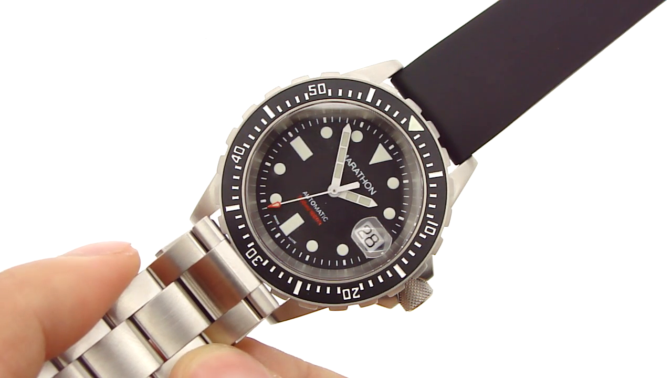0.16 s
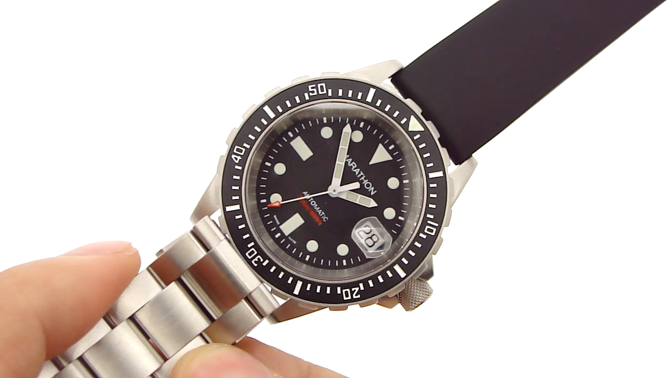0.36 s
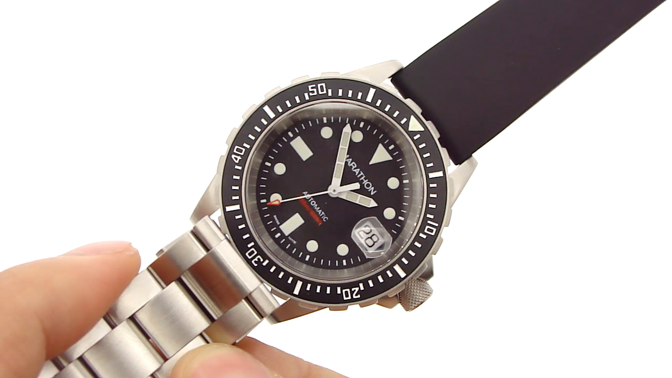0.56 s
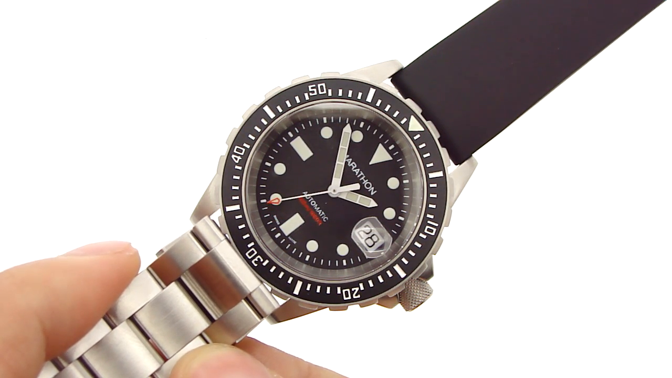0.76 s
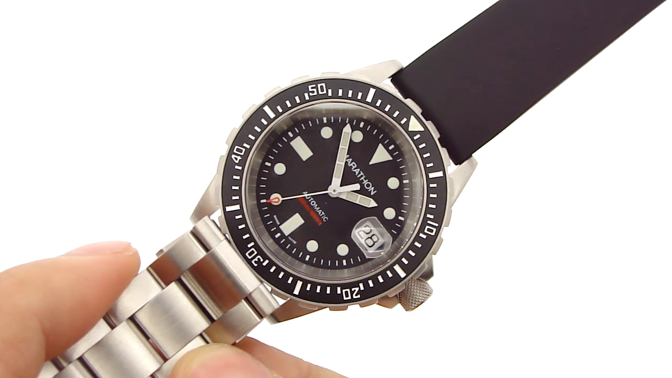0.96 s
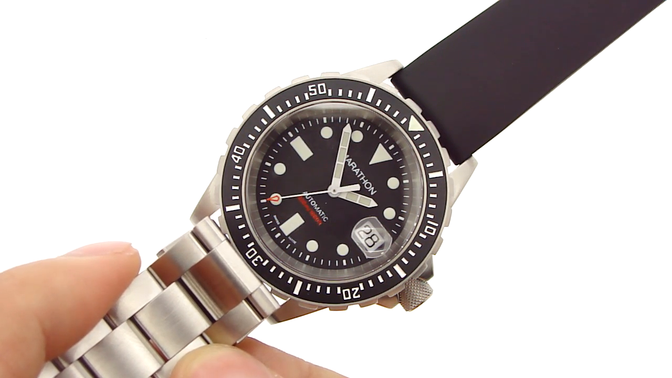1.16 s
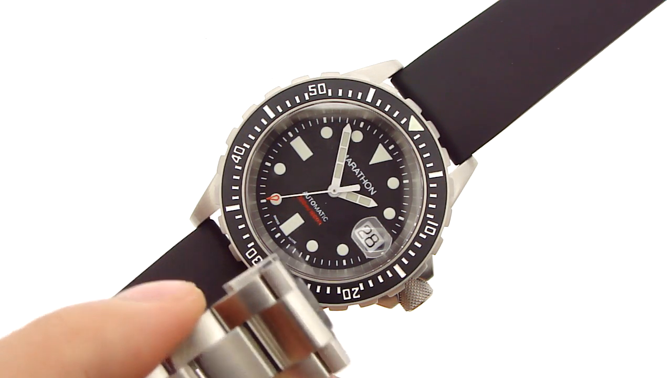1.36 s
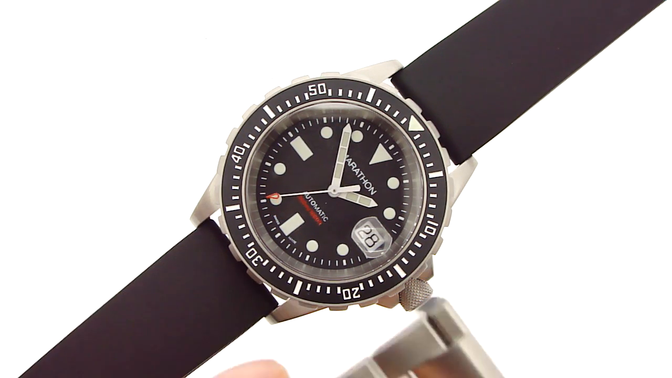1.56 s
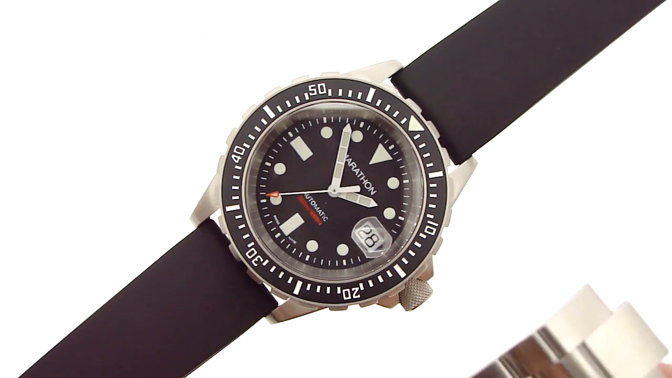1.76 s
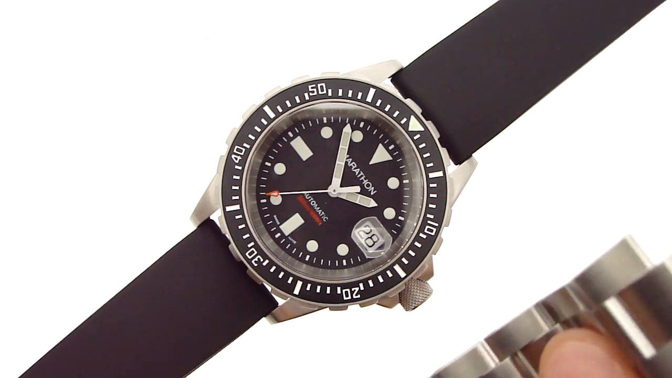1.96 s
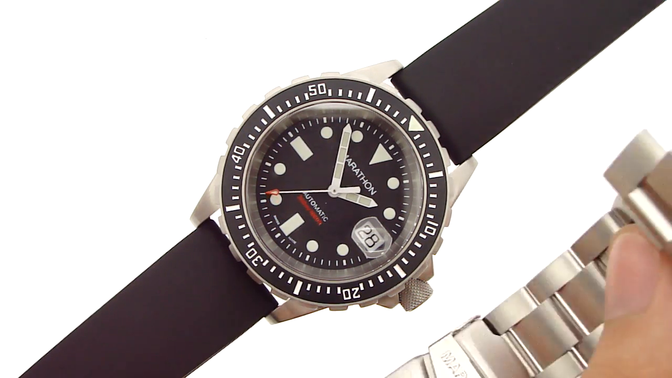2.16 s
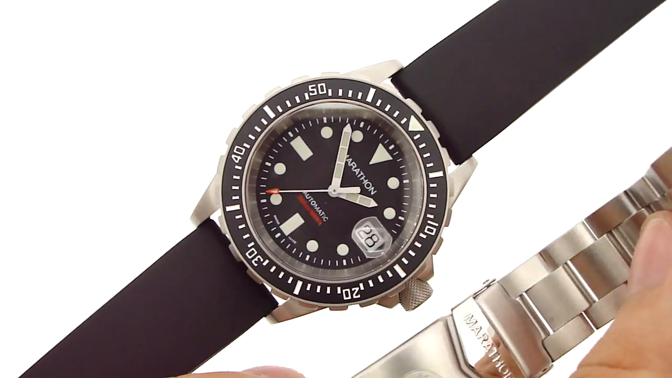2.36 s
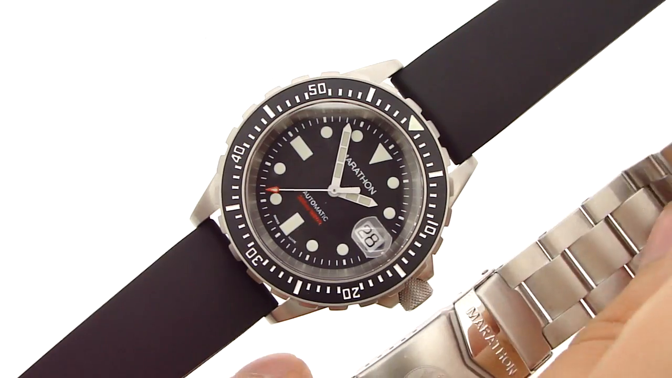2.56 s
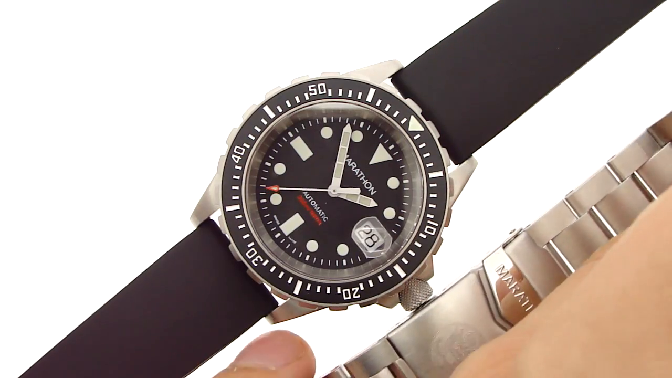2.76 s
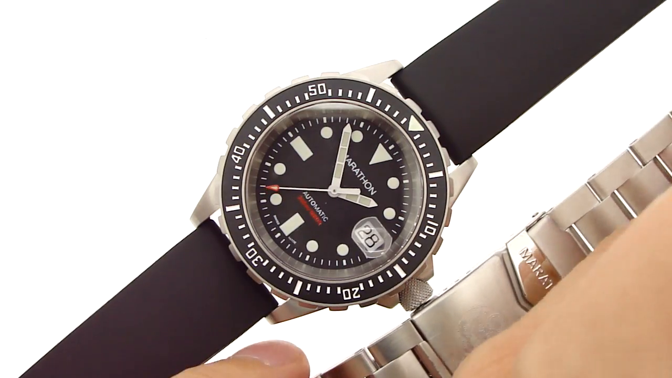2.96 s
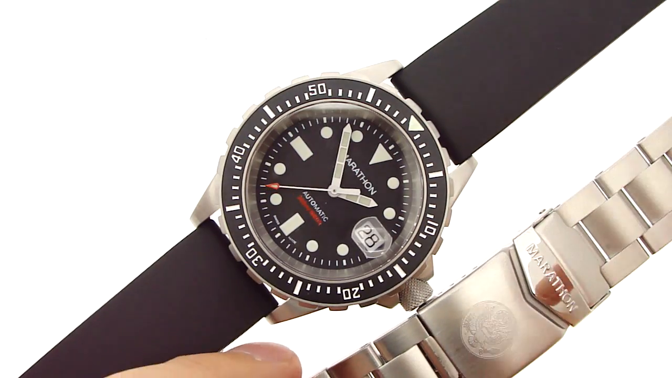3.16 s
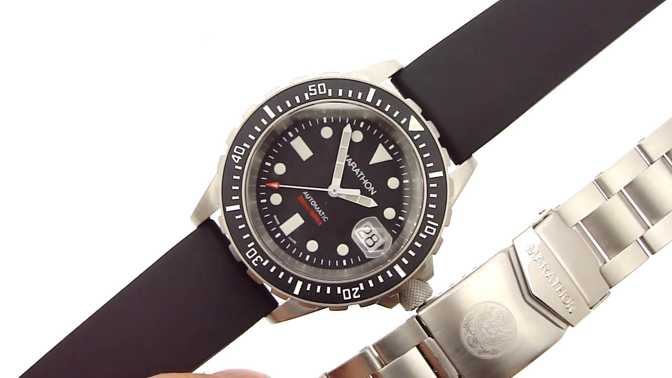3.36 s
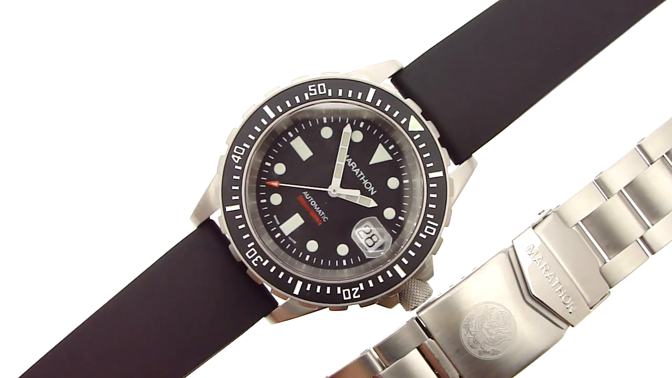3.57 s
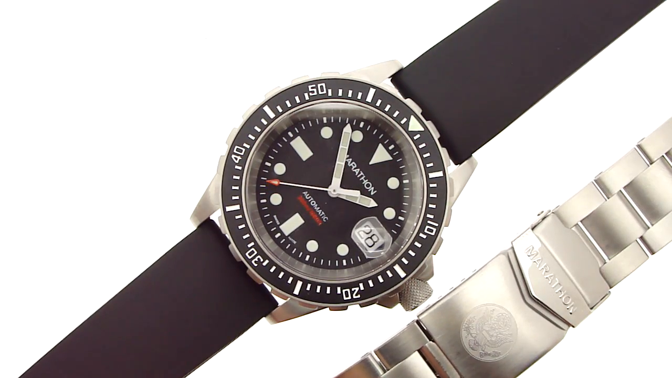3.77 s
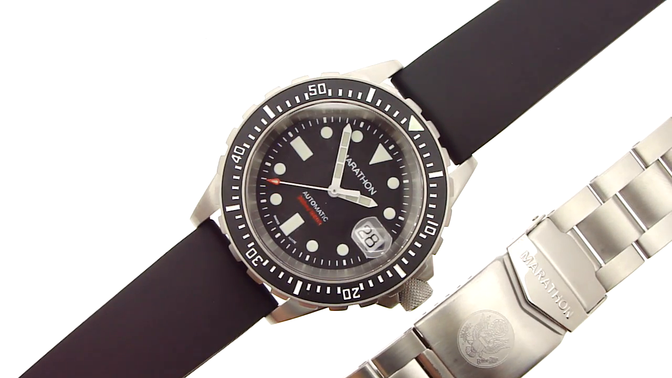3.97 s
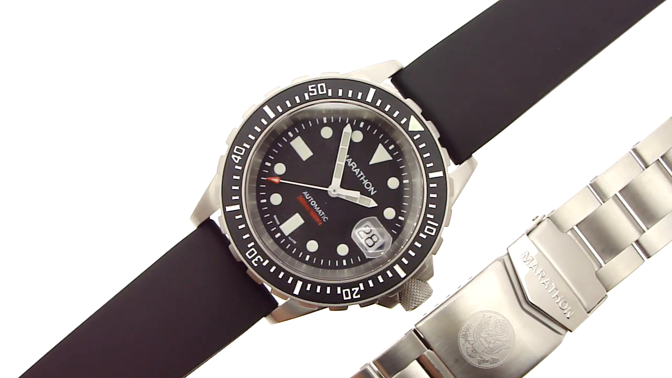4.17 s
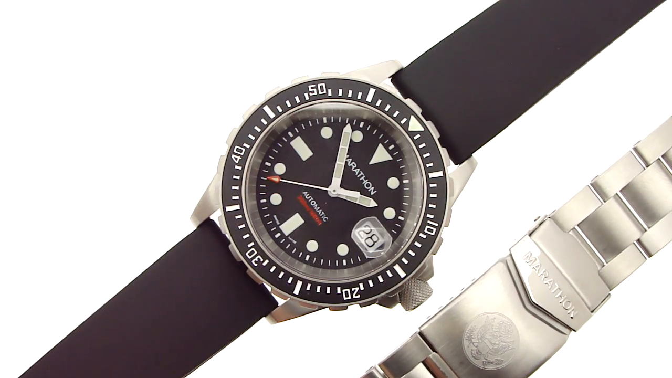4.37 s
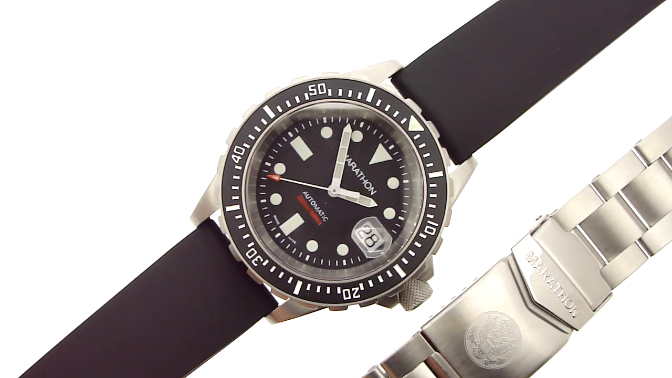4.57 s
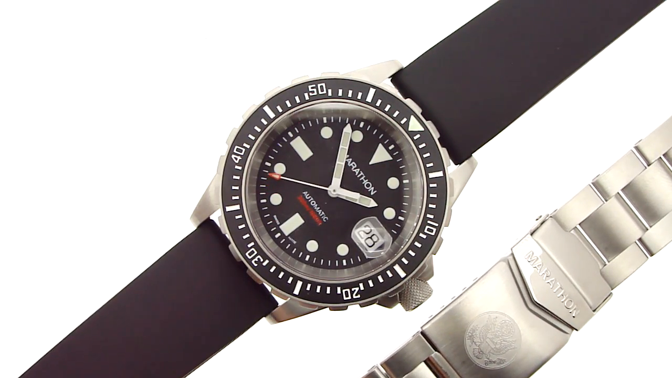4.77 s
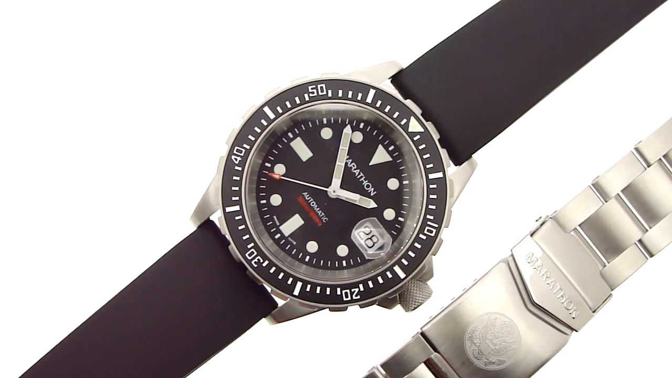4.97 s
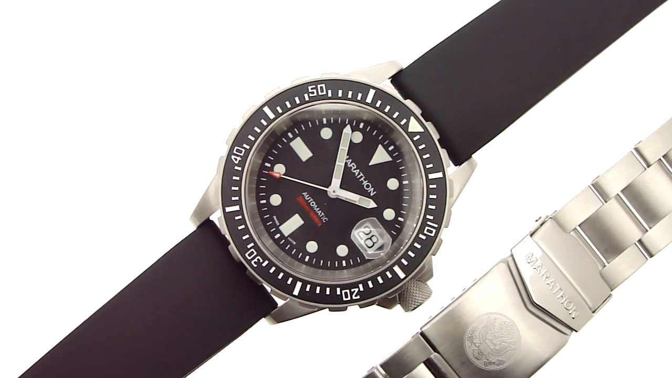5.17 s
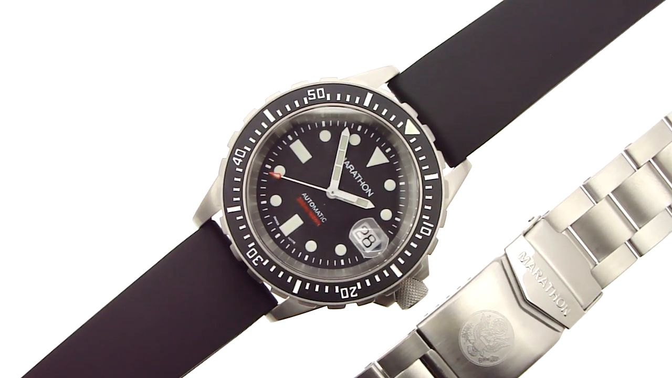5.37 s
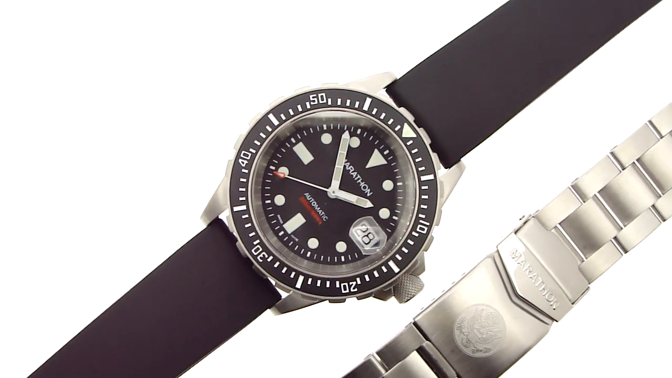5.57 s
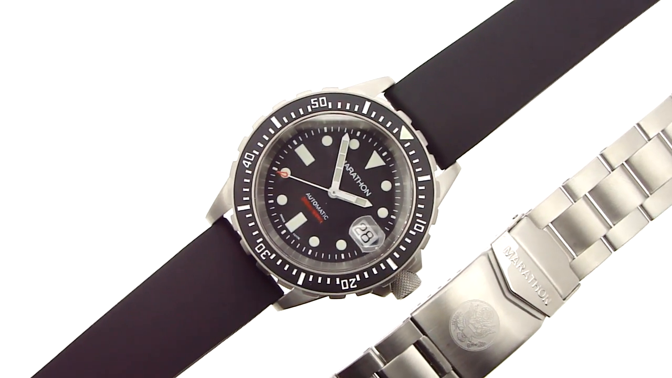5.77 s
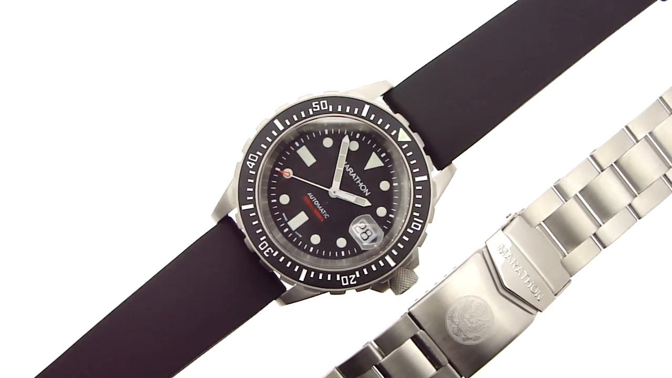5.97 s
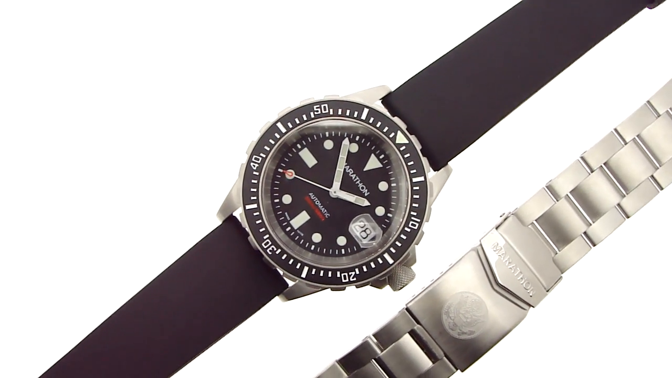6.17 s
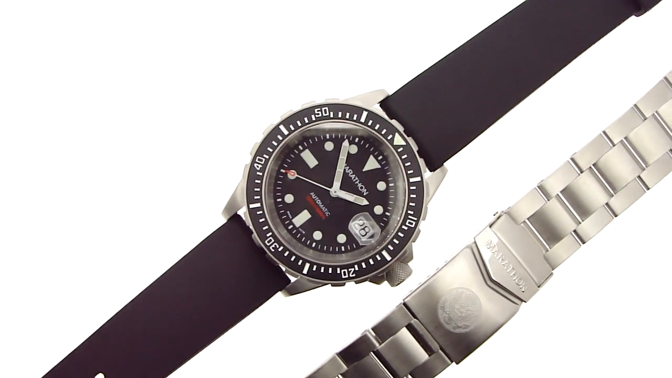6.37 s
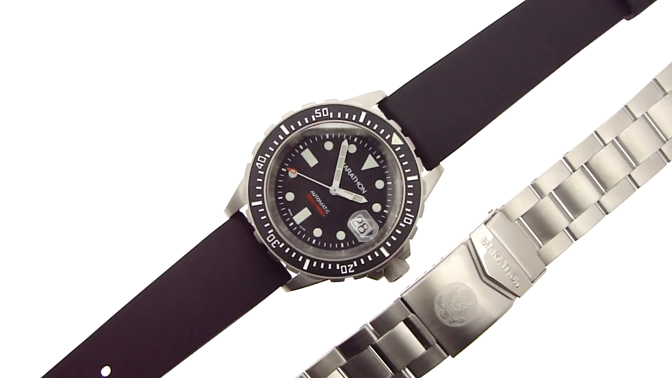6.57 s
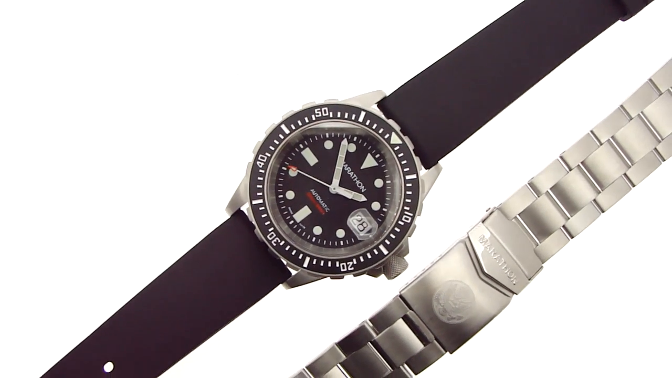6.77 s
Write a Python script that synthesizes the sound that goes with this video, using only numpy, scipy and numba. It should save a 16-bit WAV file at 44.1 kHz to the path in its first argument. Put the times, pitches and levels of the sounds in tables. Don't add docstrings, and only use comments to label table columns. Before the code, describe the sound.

Indoors, a fan hums steadily with airy duct noise. A steel bracelet ticks faintly as it is lifted, then its links land in sharp clinks, slide and scrape, tip over and settle with brighter clatter on a hollow board. After a pause, fingers tap and rub the camera shell and its zoom motor whirs. The close small-camera microphone sounds slightly dull at the top, and the hum dips after loud hits.

```python
import sys
import numpy as np
from scipy import signal
from scipy.fft import rfft, irfft
from scipy.io import wavfile
from scipy.ndimage import uniform_filter1d
from numba import njit

SR = 44100
rng = np.random.default_rng(int(sys.argv[2]) if len(sys.argv) > 2 else 0)


def bounce(signal):
    frames = np.transpose(np.atleast_2d(signal))
    limited = np.clip(frames, -1, 1)
    pcm = np.round(limited * 32767).astype(np.int16)
    wavfile.write(sys.argv[1], SR, pcm)


def gain_from_db(level_db):
    decades = np.asarray(level_db, float) / 20
    return 10 ** decades


N = 300743

# mode_hz, width_hz, level_db
LINKS = [(2840, 570, 8.5), (2870, 98, -6), (3420, 300, -6), (3540, 97, -13), (4240, 420, -11),
         (4670, 280, 1.5), (4750, 370, -27), (5500, 170, -10), (6200, 230, -17), (6930, 400, -2.5),
         (8850, 510, 1.5), (9400, 200, -20), (9500, 290, -3), (10430, 210, -7.5), (11000, 1600, -20)]
BOARD = [(383, 62, -7), (560, 67, 2.5), (710, 150, 1), (1049, 60, 0.5), (1280, 86, -3), (1430, 250, 3)]
CASE = [(370, 46, -1.5), (580, 78, 0), (720, 59, -4), (1150, 140, -1), (1590, 84, 4), (2050, 300, -8)]


def level(x, db):
    return x * gain_from_db(db) / np.sqrt(np.mean(x ** 2))


def curve(rows):
    s, value = np.transpose(np.array(rows, float))
    return np.interp(np.arange(N) / SR, s, value, left=-150, right=-150)


def band(x, lo_hz, hi_hz, order=2):
    return signal.sosfilt(signal.butter(order, [lo_hz, hi_hz], "band", fs=SR, output="sos"), x)


def even_band(x, lo_hz, hi_hz):
    return signal.sosfiltfilt(signal.butter(2, [lo_hz, hi_hz], "band", fs=SR, output="sos"), x)


def ring(modes, gain, size=1536):
    hz, width_hz, db = np.transpose(modes)[:, :, None]
    t = np.arange(size) / SR
    sines = np.exp(-np.pi * width_hz * t) * np.sin(2 * np.pi * hz * t)
    return np.sum(gain[:, None] * gain_from_db(db) * sines, axis=0)


def walk(rate_hz):
    hold = int(SR / rate_hz)
    held = np.repeat(rng.standard_normal(N // hold + 1), hold)
    return 1.104 * uniform_filter1d(uniform_filter1d(held, hold), hold)[:N]


def fan():
    # freq_hz, density_db_per_hz
    room_air = [(15, -72), (25, -35), (55, -34), (91, -23.5), (118, -7.5), (201, -7.5), (234, -1.5),
                (431, -11), (515, -12.5), (925, -11), (1390, -12.5), (1580, -13), (2090, -11.5),
                (3300, -22.5), (10900, -37), (14200, -79), (22000, -120)]
    # centre_hz, width_hz, lift_db
    duct = [(250, 330, 1), (745, 25, 9), (1167, 22, 3.5), (1351, 91, 6.5), (1550, 150, -1.5),
            (1815, 85, 3.5), (2095, 70, 6), (3470, 120, 0.5), (4340, 630, 3), (7000, 160, 6.5),
            (9900, 1340, 5)]
    # line_hz, rms_db
    blade_lines = [(58.6, -71), (73, -74), (117, -62.5), (131, -56), (176, -58.5), (234, -53.5), (468, -65),
                   (526, -63), (1346, -71), (1754, -58)]
    # time_s, share of the 2 kHz air masked (0-1)
    shade = [
        (0, 0.05),
        (3.5, 0.06),
        (4.6, 0.2),
        (5.3, 0.43),
        (6.82, 0.47),
    ]
    f = np.maximum(np.fft.rfftfreq(N, 1 / SR), 1)
    hz, db = np.transpose(room_air)
    shape_db = np.interp(np.log(f), np.log(hz), db)
    for centre_hz, width_hz, lift_db in duct:
        shape_db = shape_db + lift_db / (1 + (2 * (f - centre_hz) / width_hz) ** 2)
    air = irfft(rfft(rng.standard_normal(N)) * gain_from_db(shape_db), N) * gain_from_db(.5 * walk(3.16))
    air = air - np.clip(curve(shade), 0, 1) * even_band(air, 1920, 2410)
    turn = 2 * np.pi * np.cumsum(1 + 0.000593 * walk(1.964)) / SR
    lines = 0
    for line_hz, rms_db in blade_lines:
        gain = np.sqrt(2) * gain_from_db(rms_db + 2.0 * walk(6))
        lines = lines + gain * np.sin(line_hz * turn + 6 * rng.random())
    return level(air, -43) + lines


def strokes(rows, body):
    attack_db_s, release_db_s = 316, 189
    flat_db, tipped_db = (2.1, -4, -3.5, -11), (1, 0.5, 3.5, 9.4)
    t, power = np.arange(0, N / SR, .001), 0
    for start_s, hold_s, pressure_db, metal_db, tipped in rows:
        db = (pressure_db, pressure_db, metal_db, metal_db)[body]
        db = db + np.interp(tipped, [0, 1], [flat_db[body], tipped_db[body]])
        fade_db = attack_db_s * np.maximum(start_s - t, 0) + release_db_s * np.maximum(t - start_s - hold_s, 0)
        power = power + gain_from_db(db - fade_db) ** 2
    return np.interp(np.arange(N) / SR, t, np.sqrt(power))


def scrape():
    # start_s, hold_s, pressure_db, metal_db, share tipped on edge (0-1)
    chain_strokes = [
        (1.35, 1, -69, -69.5, 0.63),
        (2.36, 0.35, -51.5, -62.5, 0.62),
        (2.66, 0.15, -44, -43.5, 0),
        (2.89, 0.081, -47.5, -50, 0.1),
        (3.02, 0.13, -52, -57, 1),
        (3.21, 0.093, -53.5, -62, 0.73),
        (3.36, 0.016, -51, -45, 0.4),
        (3.41, 0.033, -53, -49, 0.25),
        (2.57, 0.046, -61, -56, 0.1),
    ]
    finger_strokes = [
        (4.9, .35, -67, -61, .3),
        (5.04, 0.19, -56, -64, 0.73),
        (5.345, 0.045, -41, -52, 0.3),
        (5.48, 0.15, -66, -64, 0.25),
    ]
    # mode_hz, width_hz, level_db
    mat = [(1660, 320, 9), (2070, 250, 11.5), (3020, 760, 18), (3200, 460, -17)]
    singing_link = [(4550, 50, -19)]
    out, slips_db = 0, 3.8 * walk(150) + 1.8 * walk(30)
    links = LINKS[2:5] + singing_link + LINKS[5:8]
    for rows, base in ((chain_strokes, BOARD), (finger_strokes, CASE)):
        bodies = ((base, 1.3), (mat, 1.1), (links, 2.2), (LINKS[8:], 2.4))
        for body, (modes, damp) in enumerate(bodies):
            grit = rng.standard_normal(N) * gain_from_db(slips_db + 1.1 * walk(60))
            signs = np.sign(rng.standard_normal(len(modes)))
            voiced = signal.fftconvolve(grit, ring(np.array(modes) * [1, damp, 1], signs))[:N]
            voiced = band(voiced, 0.7 * modes[0][0], 0.84 * modes[-1][0], order=1)
            out = out + strokes(rows, body) * level(voiced, 0)
    return out


def families(rows, face_db, edge_db):
    s, face, edge, *rest = np.transpose(rows)[:, :, None]
    power = gain_from_db(face + face_db) ** 2 + gain_from_db(edge + edge_db) ** 2
    return np.hstack([s, 10 * np.log10(power), *rest])


def contacts(events, body, base, damp, touch_db, touch_ms, tail_db, tail_ms, knock_damp, upper_db,
             thump_db, shed_db, size=2048, count=320):
    family_edge_hz = [1850, 3700, 5800, 7800, 11500]
    soft_below_db, soft_span_db = -25, 13
    out, ms = np.zeros(N + 2 * size), (np.arange(size) - count) * 1e3 / SR
    late_ms = np.maximum(ms, 0)
    chances = rng.standard_normal((len(events), 7, size))
    for (s, *levels, hit_hz), chance in zip(events, chances):
        modes = np.array(body, float) * [1, damp, 1]
        modes[:, 0] *= 1 + 0.012 * chance[0, :len(modes)]
        weight = gain_from_db(2.5 * chance[0, -len(modes):]) * np.sign(chance[0, 99:99 + len(modes)])
        struck = ring(modes, weight, size=512)
        freed = ring(modes * [1, .45, 1], .6 * weight, size=512)
        graze = np.exp(np.where(ms < 0, ms / 0.26 - 1.2, -ms / touch_ms))
        touches = gain_from_db(touch_db) * chance[1] ** 3 * graze
        hard = np.clip(1 + (max(levels[:4]) - soft_below_db) / soft_span_db, 0, 1)
        touches[count] += .06 + .94 * hard
        levels[:4] = np.array(levels[:4]) + shed_db * hard
        tail = gain_from_db(tail_db) * np.exp(np.where(ms < 0, ms / 3.6 - 1.3, -ms / tail_ms))
        parts = []
        for k in range(4):
            rattle = tail * chance[2 + k]
            rung = (signal.fftconvolve(touches, struck) + signal.fftconvolve(rattle, freed))[:size]
            parts.append(even_band(rung, *family_edge_hz[k:k + 2]))
        lift_db = np.clip(4.6 * (levels[3] - levels[1]) + upper_db, -5, 14) * (np.array(base)[:, 0] > 900)
        base_gain = gain_from_db(lift_db + 1.2 * chance[0, 199:199 + len(base)])
        board = ring(np.array(base) * [1, knock_damp, 1], base_gain, size=size)
        push = np.abs(chance[6]) * late_ms * np.exp(-late_ms / 0.023)
        knock = band(signal.fftconvolve(push, board)[:size], 300, 2000)
        sway = late_ms / 9.7 * np.exp(-late_ms / 4.1) * np.sin(2 * np.pi * 0.073 * late_ms)
        parts.append(knock + gain_from_db(thump_db) * np.max(knock) * sway)
        own = ring([(hit_hz, 25 + 0.067 * hit_hz, 0)], np.ones(1), size=512)
        parts.append(signal.fftconvolve(touches + rattle, own)[:size])
        own_db = max(levels[:4]) if hit_hz > family_edge_hz[0] else levels[4]
        at = int(s * SR) - 20 - count
        for part, db in zip(parts, levels + [own_db]):
            out[at:at + size] += gain_from_db(db) * part / np.sqrt(np.sum(part[:count + 200] ** 2) / 220)
    return out[:N]


def lifted_links():
    # time_s, face_db, edge_db, hit_hz
    ticks = [(1.3889, -66, -61, 9500), (1.5042, -68, -50, 8500), (1.5086, -66, -52, 9800),
             (1.6022, -55, -53, 7000), (1.6211, -58, -60, 4700), (1.639, -58, -54, 6200),
             (1.6439, -56, -60, 9500), (1.718, -57, -59, 4800), (1.7446, -65, -60, 6700),
             (1.8962, -42, -52, 5570), (1.9073, -47, -44.5, 5300), (1.9345, -55, -57, 6300),
             (2.1504, -54, -59, 5830), (2.1814, -58, -59, 6200)]
    # mode_hz, width_hz, level_db
    hanging = [(3000, 500, -5), (4400, 450, -8), (5270, 220, -5), (5730, 200, -2), (6240, 280, 5),
               (7000, 210, 8), (8140, 400, -1), (9300, 400, -7), (10630, 450, 3)]
    rows = np.insert(ticks, 3, -53, axis=1)
    events = families(rows, face_db=(-14, 3, -11, -14), edge_db=(-12, -17, -10, 1.5))
    return contacts(events, hanging, BOARD, damp=1.4, touch_db=-23, touch_ms=2.6, tail_db=-13, tail_ms=3.1,
                    knock_damp=2.5, upper_db=0.1, thump_db=-39, shed_db=-3)


def single_parts(size=1024):
    # time_s, level_db, pitch_hz, width_hz
    struck_parts = [(2.2897, -26, 4220, 210), (2.2899, -25, 2810, 470), (2.2904, -24.5, 6400, 410),
                    (2.2975, -31, 3220, 120), (2.2975, -29, 2680, 290), (2.2976, -28, 4100, 350),
                    (2.3399, -38, 2740, 320), (2.3401, -35, 4010, 980), (2.3763, -37, 5060, 240),
                    (2.3774, -32.5, 2630, 440), (2.4736, -40, 6310, 230), (2.4739, -36, 3540, 240),
                    (2.5086, -31, 7190, 170), (2.5091, -36, 8850, 490), (2.6623, -24.5, 3270, 560),
                    (2.6624, -29.5, 4450, 350), (2.6625, -34, 5300, 380), (2.8225, -41, 2660, 180),
                    (2.8226, -20, 3380, 770), (2.8228, -18.5, 4400, 420), (2.8246, -31, 7000, 260),
                    (2.9533, -31, 7100, 370), (2.9536, -21, 8790, 320), (2.9541, -30, 5460, 300),
                    (2.9701, -29, 8820, 170), (2.9713, -32, 6250, 170), (3.0518, -26, 9600, 390),
                    (3.0519, -23, 8720, 400), (3.052, -27, 8050, 120), (3.0676, -34, 10480, 460),
                    (3.0676, -26, 8700, 410), (3.0753, -29, 8580, 820), (3.0753, -21, 10100, 580),
                    (3.112, -30, 9470, 230), (3.1122, -24, 10000, 560), (3.2636, -41, 4270, 180),
                    (3.2637, -42, 3560, 120), (3.2865, -26, 3820, 1460), (3.2866, -29, 5060, 120),
                    (3.2885, -31, 7150, 610), (3.2892, -31, 5870, 450), (3.2893, -30, 3110, 1270),
                    (3.2894, -24.5, 10500, 910), (3.3123, -27, 3500, 310), (3.3123, -23, 4560, 1270),
                    (3.3126, -28, 10430, 770), (3.3441, -26.5, 10000, 330), (3.3442, -31, 4570, 310),
                    (3.3445, -29, 7000, 610), (3.3446, -34, 2580, 220)]
    # time_s, level_db,
    # pitch_hz, width_hz
    more_parts = [(1.8958, -45, 5500, 150), (1.9075, -48, 5200, 250), (1.9345, -56, 6400, 500),
                  (2.1505, -47, 5800, 500), (2.611, -51, 4550, 200), (2.785, -48, 4550, 150),
                  (3.2872, -25, 10800, 400), (3.3445, -36, 10900, 400), (4.268, -55, 3800, 900),
                  (4.387, -51, 4500, 300), (4.9273, -38.5, 4900, 700), (4.9275, -39.5, 8300, 900),
                  (4.9284, -26, 2550, 90), (4.9308, -37, 3450, 150), (4.9327, -28.5, 2600, 110),
                  (4.9322, -36, 1260, 300), (5.0345, -53, 3500, 300), (5.2188, -30.5, 2750, 400),
                  (5.2965, -45, 3780, 150), (5.296, -46, 4670, 600), (5.343, -56, 6500, 500),
                  (5.349, -43, 700, 50), (5.37, -45, 480, 50), (2.69, -48, 550, 40), (2.75, -44, 550, 40),
                  (2.801, -48, 540, 40), (2.8227, -24, 4000, 700), (3.0527, -34, 1250, 200),
                  (3.0755, -36, 1300, 250), (2.9538, -36, 1500, 400), (2.297, -39, 380, 40),
                  (5.356, -44, 620, 60), (5.385, -46, 700, 50), (3.3123, -28, 4050, 600),
                  (2.6625, -43, 11000, 300), (2.8225, -32, 10700, 300), (2.9536, -29, 10800, 300),
                  (2.9688, -33, 10700, 400), (2.2897, -38, 10900, 300)]
    rise_ms, chatter_db, chatter_ms = .06, -23, 2.5
    touching_damp, free_damp, free_db = 2.1, .7, -13
    span = 1.4
    rows = struck_parts + more_parts
    out, ms = np.zeros(N + size), np.arange(size) * 1e3 / SR
    for (s, db, hz, width_hz), chance in zip(rows, rng.standard_normal((len(rows), size))):
        push = gain_from_db(chatter_db) * chance * np.exp(-ms / chatter_ms)
        push[0] += 1
        modes = [(hz, touching_damp * width_hz, 0), (hz, free_damp * width_hz, free_db)]
        rung = signal.fftconvolve(push, ring(modes, np.ones(2), size=512))[:size]
        rung = band(rung * (1 - np.exp(-ms / rise_ms)), hz / span, hz * span, order=1)
        at = int(s * SR)
        out[at:at + size] += gain_from_db(db) * rung / np.sqrt(np.sum(rung[:220] ** 2) / 220)
    return out[:N]


def laid_links():
    # time_s, face_down_db, edge_on_db, knock_db, hit_hz
    laying = [(2.2897, -26, -25, -34.5, 6700), (2.2976, -24.5, -22.5, -31.5, 2660),
              (2.3106, -45, -48, -47, 2800), (2.3176, -53, -62, -50, 4000), (2.34, -39, -43, -38, 2670),
              (2.3438, -42, -48, -44, 2720), (2.3762, -28, -36, -34, 5700), (2.4738, -36, -51, -30.5, 6640),
              (2.4798, -41, -74, -55, 3000), (2.5047, -41, -56, -52, 4800), (2.509, -31, -33, -46, 6040),
              (2.5223, -39, -56, -38, 5200), (2.5336, -58, -68, -54, 4000), (2.586, -53, -66, -60, 4500),
              (2.6113, -38.5, -53, -49, 4400), (2.6623, -25, -29, -42, 5200),
              (2.6713, -40, -62, -36.5, 1020), (2.7161, -52, -62, -39, 4500), (2.7363, -50, -70, -46, 4600),
              (2.7847, -45, -58, -37.5, 557), (2.7918, -44, -68, -50, 4750), (2.8228, -29, -27, -34, 4150),
              (2.8326, -54, -60, -42, 4500), (2.903, -47, -51, -41, 6840)]
    settling = [(2.9535, -29, -18.5, -30, 8700), (2.9692, -36, -23.5, -38, 6000),
                (3.0298, -63, -59, -47, 4000), (3.0527, -35, -23, -31, 8300), (3.0673, -46, -23, -42, 8500),
                (3.0753, -40, -22, -35, 9500), (3.1125, -35.5, -30.5, -39, 4100),
                (3.124, -43, -34, -44, 7900), (3.2645, -41, -51, -47, 3700),
                (3.2868, -22, -39, -38.5, 3600), (3.2897, -25, -23, -56, 3200),
                (3.2927, -36, -47, -43, 6200), (3.3124, -25, -26, -36.5, 4100),
                (3.3445, -35, -29.5, -53, 2600), (3.355, -37, -36, -46, 3500),
                (3.3684, -54, -54, -50, 4000), (3.423, -58, -64, -42, 3000)]
    events = families(laying + settling, face_db=(-4, 1.5, -4, -16), edge_db=(-12, -21, -3, -0.5))
    return contacts(events, LINKS, BOARD, damp=3.1, touch_db=-29.5, touch_ms=1.2, tail_db=-23.0, tail_ms=5.3,
                    knock_damp=0.86, upper_db=-3.0, thump_db=-16, shed_db=-6)


def focus_drive():
    # time_s, level_db
    focus = [
        (4.2, -81),
        (4.35, -70),
        (5.0, -73),
        (5.2, -95),
    ]
    whistle = band(rng.standard_normal(N), 10700, 11000)
    return level(whistle, 0) * gain_from_db(curve(focus))


def camera_taps():
    # time_s, pad_db, nail_db, knock_db, hit_hz
    taps = [(4.9272, -41, -40, -51, 2480), (4.9313, -44, -48, -37, 1150), (5.0341, -49, -55, -62, 3500),
            (5.0733, -51, -62, -50, 3200), (5.2188, -36.5, -69, -33, 3000), (5.2249, -57, -58, -56, 3000),
            (5.2955, -52, -60, -57, 3800), (5.3224, -55, -59, -51, 1380), (5.3421, -56, -59, -54, 6460),
            (5.3478, -42, -63, -40.5, 686), (5.3659, -51, -59, -52, 674), (5.3844, -51, -64, -45, 720),
            (5.4212, -51, -65, -55, 2900), (5.4609, -58, -66, -56, 4200)]
    # mode_hz, width_hz, level_db
    shell = [(2110, 350, -3), (2390, 230, 7), (2810, 120, 3), (3300, 280, -5), (3880, 480, -8),
             (4550, 580, -4), (5200, 500, -4), (6250, 590, -8), (7150, 590, -2), (8800, 450, 6),
             (9200, 500, -2), (10700, 430, 5)]
    events = families(taps, face_db=(3, -24.5, -21, -27), edge_db=(6, 5, -2, 0))
    return contacts(events, shell, CASE, damp=1.9, touch_db=-23, touch_ms=1.4, tail_db=-14.0, tail_ms=2.5,
                    knock_damp=1.8, upper_db=16.0, thump_db=-30, shed_db=0)


def zoom_motor():
    # time_s, level_db
    zoom = [
        (5.25, -57),
        (5.35, -48),
        (5.6, -54),
        (6.2, -53),
        (6.82, -52.5),
    ]
    # mode_hz, width_hz, level_db
    gears = [(2500, 280, 5), (3014, 98, 2), (4100, 420, 3), (4760, 200, -3), (5740, 270, -5.5),
             (6150, 450, -2.5), (9630, 550, -7)]
    gear_hz, gear_start_s = 25.86, 5.2
    turn = 2 * np.pi * gear_hz * (np.arange(N) / SR - gear_start_s)
    out = 0
    for mode in gears:
        depth_db = 3.7 * np.exp(-(np.log2(mode[0] / 5900) / 0.9) ** 2)
        mesh = rng.standard_normal(N) * gain_from_db(depth_db * np.cos(turn) + 1.2 * walk(12))
        out = out + np.sqrt(mode[1]) * signal.fftconvolve(mesh, ring([mode], np.ones(1), size=512))[:N]
    return level(out, 0) * gain_from_db(curve(zoom))


def room_echo(near):
    t = np.arange(SR // 4) / SR
    walls = rng.standard_normal(len(t)) * gain_from_db(-60 * t / 0.25) * (t > .004)
    return gain_from_db(-19.0) * signal.fftconvolve(near, walls / np.sqrt(np.sum(walls ** 2)))[:N]


@njit
def follow(x, attack, release):
    e, out = 0., np.empty(len(x))
    for i in range(len(x)):
        e += (x[i] - e) * (attack if x[i] > e else release)
        out[i] = e
    return out


def gain_control(near):
    loud = follow(np.abs(near), 1 / (0.018 * SR), 1 / (.15 * SR))
    return np.minimum(gain_from_db(-34.0) / (loud + 1e-9), 1) ** .5


def scene():
    near = lifted_links() + single_parts() + laid_links() + camera_taps()
    steady = fan() + focus_drive() + zoom_motor()
    return (near + room_echo(near) + scrape() + gain_control(near) * steady)[None]


def band_limit(x):
    return signal.sosfilt(signal.butter(12, 13600, fs=SR, output="sos"), x)


def record(dry):
    top_hz, converter_hz = 11030, 24000
    x = signal.sosfilt(signal.ellip(12, .3, 75, top_hz, fs=SR, output="sos"), dry[0])
    x = x - .06 * x ** 3
    mirror = band(x, 10500, 11200) * np.cos(2 * np.pi * converter_hz * np.arange(N) / SR)
    x = x + gain_from_db(-16.0) * even_band(even_band(mirror, 12400, 13300), 13000, 13400)
    return band_limit(x[None])


dry = scene()
out = record(dry)
bounce(out)
```